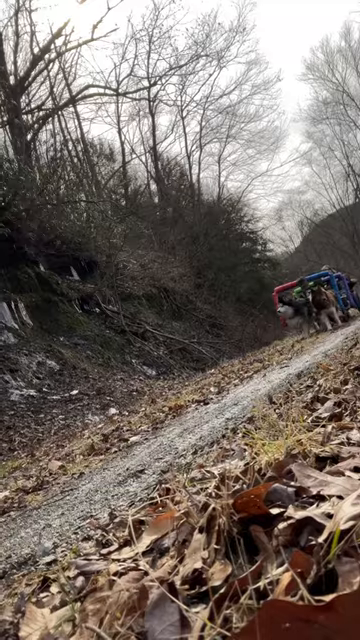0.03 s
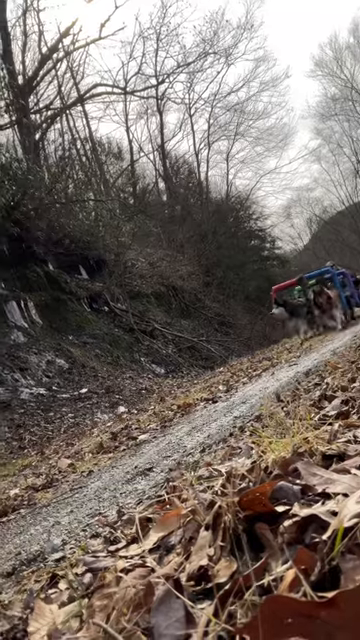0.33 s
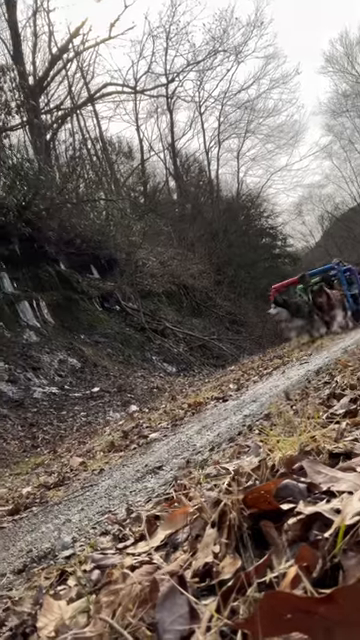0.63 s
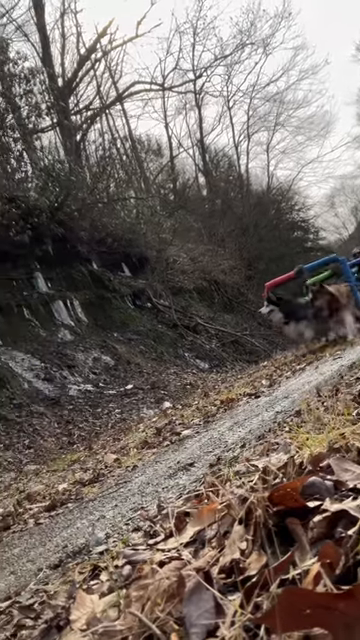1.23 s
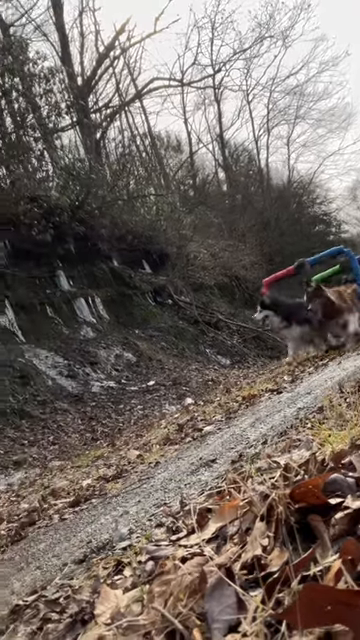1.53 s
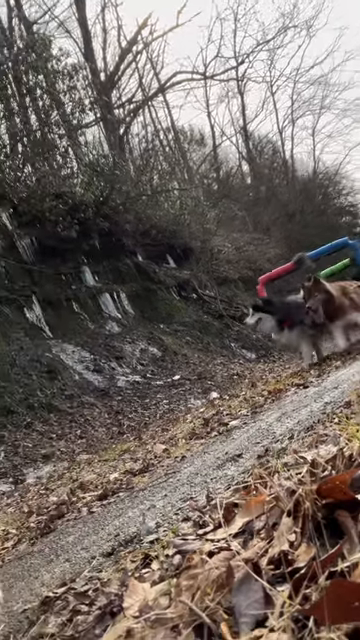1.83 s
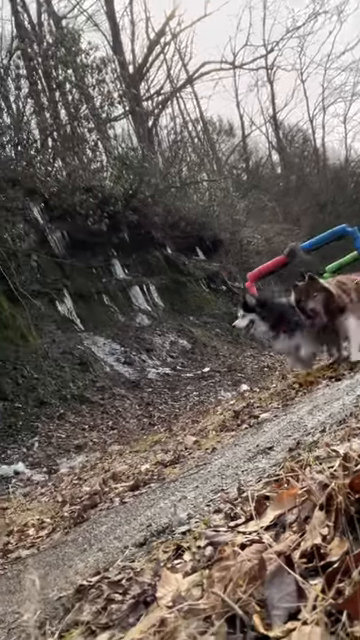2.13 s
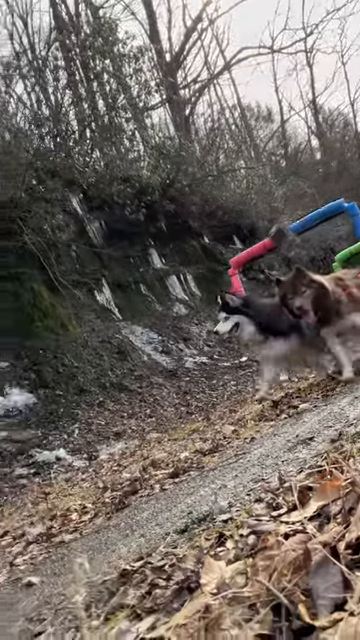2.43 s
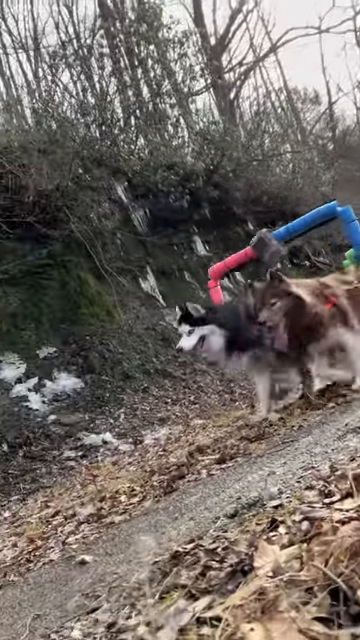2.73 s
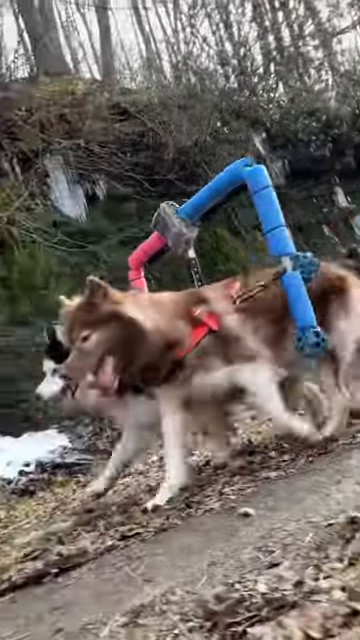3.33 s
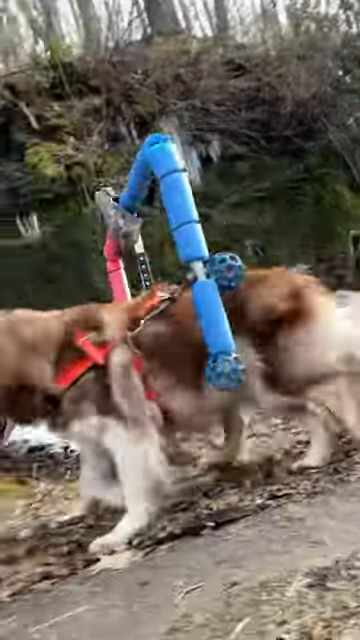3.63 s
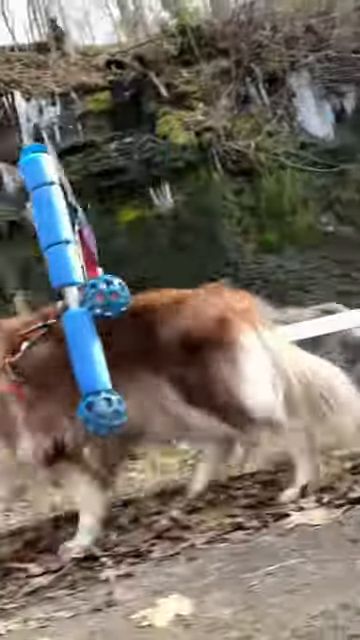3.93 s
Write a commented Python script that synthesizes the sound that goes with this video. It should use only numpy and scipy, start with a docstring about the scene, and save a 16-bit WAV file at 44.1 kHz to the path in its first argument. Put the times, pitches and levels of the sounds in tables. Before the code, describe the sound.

A crackling crunch of wheels on grit approaches outdoors, mixed with the soft steps of trotting dogs. It starts distant, then grows louder and closer, with sharp little snaps, crushed leaves and a few dull ground thumps.

```python
"""Dogs pulling a wheeled rig

Dogs trot closer down a gravel trail strewn with dry leaves. The rig's tyres crackle over the grit,
louder as they near; stones and twigs snap, and clumps of leaves are crushed. Paws pad, scuff and
drag, the ground carries dull thumps, and a few hollow knocks sound. An earth bank and trees add
a short echo, and quiet woodland air lies under it all."""
import sys
import numpy as np
from scipy import signal
from scipy.fft import rfft, irfft, next_fast_len
from scipy.io import wavfile
from scipy.ndimage import uniform_filter1d, map_coordinates

SR = 44100
rng = np.random.default_rng(int(sys.argv[2]) if len(sys.argv) > 2 else 0)


def bounce(signal):
    """Save signal as a 16-bit WAV file at the path given by the first command-line argument."""
    frames = np.transpose(np.atleast_2d(signal))
    limited = np.clip(frames, -1, 1)
    pcm = np.round(limited * 32767).astype(np.int16)
    wavfile.write(sys.argv[1], SR, pcm)


N = 176400  # 4 seconds

# Levels in all tables are relative: the code turns each layer up or down as a whole.
# Tone of crackling grit as the microphone colours it, with a peak near 8.4 kHz and a dip
# near 10 kHz: pitch_hz, level_db
GRIT_AT_MIC = [(880, -39), (1500, -12), (2060, -10), (2710, -1.5), (2990, -3), (3820, -3.5), (5450, -5),
               (8490, 2), (10200, -5.5), (13900, -1), (15200, -2.5), (15800, -4)]
# Tone of a brittle snap as the microphone colours it, with the same treble peak and dip:
# pitch_hz, level_db
SNAP_AT_MIC = [(40, -38), (300, -33.5), (1200, -14), (2500, 3), (3700, 5.5), (5000, 2), (6500, 3),
               (8400, 8.5), (10000, 0), (12000, 3.5), (15500, 0.5)]
# Tone of dry leaves: pitch_hz, level_db
LEAF_TONE = [(40, -42), (200, -25), (700, -2.5), (1300, -1), (1900, 0.5), (2800, 7), (3600, -0.5),
             (5000, -17.5), (12000, -47)]


def amp(db):
    """Turn decibels into a gain to multiply by."""
    return 10 ** (np.asarray(db) / 20)


def unit(x):
    """Scale x to an average power of 1."""
    return x / np.sqrt(np.mean(x ** 2) + 1e-20)


def since(start_s):
    """Seconds since a moment, zero before it."""
    return np.maximum(np.arange(N) / SR - start_s, 0)


def swell(start_s, swell_s):
    """A loudness curve that rises from start_s, reaches 1 after swell_s and dies away."""
    age = np.minimum(since(start_s) / swell_s, 20)
    return (age * np.exp(1 - age)) ** 2


def wobble(per_s):
    """A smooth curve through per_s random values a second."""
    values = rng.standard_normal(int(N * per_s / SR) + 4)
    return map_coordinates(values, [np.arange(N) * per_s / SR])


def coloured(x, tone):
    """Filter x to the shape of a tone table; white noise keeps its overall power."""
    size = 2 * next_fast_len(N // 2 + 8192)
    pitch_hz, level_db = np.transpose(tone)
    log_pitch = np.log(np.fft.rfftfreq(size, 1 / SR) + 1)
    gain = unit(amp(np.interp(log_pitch, np.log(pitch_hz), level_db)))
    # Make the filter ring only after each click, never before it (minimum phase).
    cepstrum = irfft(np.log(gain + 1e-6), size)
    cepstrum[1:size // 2] *= 2
    cepstrum[size // 2 + 1:] = 0
    return irfft(rfft(x, size) * np.exp(rfft(cepstrum)), size)[:N]


def add_tails(x, decay_s):
    """Give every spike in x a fading tail."""
    return signal.lfilter([1], [1, -np.exp(-1 / (SR * decay_s))], x)


def grains(per_s, spread_db, range_db):
    """Random tiny impacts, many small and a few large, each blurred by the leaf litter."""
    hits = rng.random(N) < per_s / SR
    strength = hits * amp(np.minimum(spread_db * rng.exponential(size=N), range_db))
    clicks = unit(strength * np.sign(rng.standard_normal(N)))
    blur = unit(np.sqrt(add_tails(strength ** 2, decay_s=0.0021)) * rng.standard_normal(N))
    return unit(clicks + amp(-4) * blur)


def woodland_air():
    """A quiet, steady hush."""
    # Tone of the air: pitch_hz, level_db
    air_tone = [(25, -38), (38, -50), (52, -27), (70, 4.5), (110, -1), (200, 0.5), (400, -1), (1200, -3),
                (4000, -24), (15000, -6.5)]
    return amp(-53) * coloured(rng.standard_normal(N), air_tone)


def bank_echo(x, fade_s=0.14):
    """The earth bank and trees scatter sound back; the echo falls 60 dB in fade_s."""
    t = np.arange(SR // 4) / SR
    tail = rng.standard_normal(len(t)) * np.exp(-np.log(1000) * t / fade_s)
    return signal.fftconvolve(x, tail / np.linalg.norm(tail))[:N]


def ground_thumps(typical_hz=82):
    """Low bumps that the ground quickly damps, each a deep note mixed with rumble."""
    # Bumps: start_s, level_db
    bumps = [(0.167, -50), (0.961, -53), (1.208, -53), (2.152, -50), (2.273, -53), (2.642, -44),
             (2.683, -45), (2.83, -52), (2.95, -47), (3.276, -48), (3.44, -40.5), (3.621, -46),
             (3.718, -45), (3.953, -39.5)]
    # Tone of the ground's rumble: pitch_hz, level_db
    rumble_tone = [(35, -53), (60, -16), (85, 3), (125, -6), (200, -12), (600, -36)]
    pitches_hz = typical_hz * np.exp(0.11 * rng.standard_normal(len(bumps)))
    rumble = amp(-11) * coloured(rng.standard_normal(N), rumble_tone)
    sound = np.zeros(N)
    for (start_s, level_db), pitch_hz in zip(bumps, pitches_hz):
        note = amp(-5.5) * np.sin(2 * np.pi * pitch_hz * since(start_s))
        sound += amp(level_db) * swell(start_s, swell_s=0.015) * (note + rumble)
    return sound


def hollow_knocks():
    """A few dull, rattly knocks, as if from the rig's frame."""
    # Knocks: start_s, pitch_hz, level_db, swell_s
    knocks = [(.115, 158, -46, 0.011), (0.753, 312, -37.5, 0.0045), (3.891, 231, -41, 0.014)]
    rattle = 0.5 * wobble(per_s=150)
    sound = np.zeros(N)
    for start_s, pitch_hz, level_db, swell_s in knocks:
        note = np.sin(2 * np.pi * pitch_hz * since(start_s) + rattle)
        sound += amp(level_db) * swell(start_s, swell_s) * note
    return sound


def paw_drags(width_hz=1080):
    """Paws drag over coarse gravel: the stones chatter at a pitch that sinks as the stroke slows."""
    # Strokes of a paw: start_s, length_s, from_hz, to_hz, level_db
    strokes = [(0.39, .10, 1685, 1345, -45.5), (2.867, 0.051, 2920, 2710, -39),
               (3.064, 0.096, 2900, 2665, -36), (3.097, 0.084, 4580, 4470, -36.5),
               (3.298, 0.082, 3634, 3440, -33), (3.441, 0.065, 1497, 1358, -40),
               (3.536, 0.1, 3700, 3090, -33.5), (3.765, .09, 3062, 2262, -33.5),
               (3.862, .065, 2200, 1903, -32), (3.925, 0.072, 2620, 2420, -40)]
    chatter = grains(per_s=790, spread_db=3, range_db=9) * np.exp(2j * np.pi * rng.random(N))
    low_pass = signal.butter(2, width_hz / 2, fs=SR)
    slow_chatter = unit(signal.lfilter(*low_pass, [chatter.real, chatter.imag]))
    sound = np.zeros(N)
    for start_s, length_s, from_hz, to_hz, level_db in strokes:
        progress = np.minimum(since(start_s) / length_s, 1)
        phase = 2 * np.pi * np.cumsum(from_hz + (to_hz - from_hz) * progress) / SR
        # Shift the chatter up into a band around the sliding pitch.
        stones = slow_chatter[0] * np.cos(phase) + slow_chatter[1] * np.sin(phase)
        arch = np.sqrt(abs(np.sin(np.pi * progress)))
        sound += amp(level_db - 1.5) * arch * stones
    return sound


def paw_steps():
    """Each paw pads softly on the ground, scuffs the grit and scrapes the leaves."""
    # Paws landing: start_s, pad_db, scuff_db, scrape_db
    steps = [(0.409, -63, -27.5, -34.5), (0.449, -66, -32, -39), (0.561, -41, -48, -35.5),
             (0.689, -47, -30.5, -45), (0.779, -43, -50, -42), (0.869, -65, -43, -45),
             (1.293, -40.5, -33, -43), (1.388, -39, -38, -44), (1.529, -46, -48, -55),
             (1.686, -41, -50, -56), (1.789, -43, -46, -60), (1.918, -36, -49, -60),
             (2.121, -39.5, -28, -33.5), (2.178, -38.5, -50, -53), (2.286, -38, -28, -32),
             (2.379, -37.5, -32, -34.5), (2.614, -47, -26, -29.5), (2.642, -29.5, -34, -36),
             (2.738, -39, -29, -34), (2.87, -37.5, -21.5, -36), (3.091, -31, -27, -37),
             (3.129, -52, -21, -42), (3.312, -29.5, -28, -31.5), (3.555, -42, -22, -36),
             (3.598, -46, -22, -25.5), (3.667, -30.5, -33, -30), (3.779, -39, -29, -26.5),
             (3.816, -34, -38, -30), (3.871, -43, -26, -27), (3.936, -30, -32, -45)]
    # Tone of a soft paw on the ground: pitch_hz, level_db
    pad_tone = [(30, -34), (60, 9), (130, -10), (240, -3), (400, 2.5), (550, 1.5), (800, -2), (1500, -11),
                (5000, -48)]
    pad, scuff, scrape = np.zeros((3, N))
    for start_s, pad_db, scuff_db, scrape_db in steps:
        pad += amp(pad_db - 9.5) * swell(start_s, swell_s=0.013)
        slide = swell(start_s, swell_s=0.016)
        scuff += amp(scuff_db - 10) * slide
        scrape += amp(scrape_db - 8) * slide
    grit = grains(per_s=1100, spread_db=4, range_db=13)
    thuds = pad * coloured(rng.standard_normal(N), pad_tone)
    return thuds + coloured(scuff * grit, GRIT_AT_MIC) + coloured(scrape * grit, LEAF_TONE)


def leaf_crushes():
    """A clump of leaves and grit gives way in a quick run of tiny breaks."""
    # Clumps collapsing: start_s, bright_db, hollow_db, swell_s
    clumps = [(0.566, -28, -24, 0.0027), (0.586, -25, -33, 0.0051), (0.711, -29, -32, .004),
              (2.1874, -12.5, -10, 0.0038), (2.298, -13, -12.5, 0.0036), (2.61, -13, -8.5, 0.0038),
              (2.649, -22, -4, 0.0061), (2.67, -9, -10.5, .0035), (2.854, -11.5, -9, .0043),
              (3.164, -11, -16, 0.0045), (3.306, -13, -24, 0.0069), (3.343, -15, -12, 0.0058),
              (3.482, -16.5, -26, 0.0081), (3.610, -4, -12.5, 0.004), (3.66, -7.5, -10, 0.0084),
              (3.78, -20, -3, 0.0025)]
    bright, hollow = np.zeros((2, N))
    for start_s, bright_db, hollow_db, swell_s in clumps:
        collapse = amp(bright_db - 12.5) * swell(start_s, swell_s)
        bright += collapse
        hollow += amp(hollow_db + 4.5) * collapse  # set relative to the bright part
    breaks = grains(per_s=5000, spread_db=3.5, range_db=15)
    return coloured(bright * breaks, SNAP_AT_MIC) + coloured(hollow * breaks, LEAF_TONE)


def snap_burst(decay_s, ring_hz, ring_db, lead_samples):
    """One break: a burst of noise that rings briefly at its own pitch, then a short scatter."""
    rise_s, scatter_s = 0.0011, 0.012
    ring_width_octaves, ring_cycles = 0.18, 7
    t = np.arange(2048) / SR
    after_peak = np.maximum(t - rise_s, 0)
    fall = np.exp(-after_peak / decay_s) + amp(-22) * np.exp(-after_peak / scatter_s)
    shape = np.minimum(t / rise_s, 1) ** 2 * fall
    spectrum = rfft(np.roll(shape * rng.standard_normal(len(t)), lead_samples))
    spectrum /= np.sqrt(uniform_filter1d(abs(spectrum) ** 2, size=50))  # a break stirs all pitches alike
    ripple_db = 2 * map_coordinates(rng.standard_normal(40), [np.linspace(0, 39, len(spectrum))])
    octaves_away = np.log2((np.fft.rfftfreq(len(t), 1 / SR) + 1) / ring_hz)
    boost_db = ring_db * np.exp(-(octaves_away / ring_width_octaves) ** 2)
    burst = unit(irfft(spectrum * amp(ripple_db + boost_db))) * np.sqrt(np.mean(shape ** 2))
    ring_fade = np.exp(-ring_hz * after_peak / ring_cycles)
    ring = amp(ring_db - 20) * np.sin(2 * np.pi * ring_hz * t) * ring_fade
    return burst + np.roll(ring, lead_samples + round(rise_s * SR))


def stone_and_twig_snaps():
    """Stones pop from under the tyres and twigs break, some with a hollow body."""
    # Single snaps: start_s, bright_db, hollow_db, decay_s, ring_hz, ring_db
    snaps = [(0.313, -16, -17, 0.0026, 2200, 10), (0.338, -21, -18.5, 0.0011, 2730, 1),
             (0.3756, -22, -21.5, 0.0014, 1950, 0), (0.4822, -15.5, -18, 0.0015, 12000, 13),
             (0.483, -22, -20, 0.0017, 1760, 7), (0.521, -24, -20.5, 0.0011, 2160, 10),
             (0.5394, -10, -18, .0013, 2000, 19), (0.5942, -19.5, -26, .001, 11660, 18),
             (0.7497, -15.5, -31, 0.0012, 5600, 15), (0.8617, -21, -23, 0.0011, 7800, 4),
             (1.051, -18, -21, 0.0012, 8400, 2), (1.1889, -13.5, -26, 0.00087, 8600, 5),
             (1.2882, -18.5, -21, 0.00061, 7240, 6), (1.3835, -22.5, -33, .0023, 8800, 5),
             (1.724, -21, -33, 0.00073, 8030, 5), (1.7989, -18.5, -20, .0008, 8600, 9),
             (1.822, -25, -27, .001, 3540, 4), (1.893, -18.5, -20, 0.00053, 7980, 6),
             (1.915, -17.5, -19, 0.0023, 9000, 9), (1.9782, -18.5, -17, .0009, 2050, 9),
             (1.986, -17.5, -29, .001, 4100, 6.5), (2.054, -22, -23, .001, 8200, 1),
             (2.066, -18.5, -26, .0014, 8000, 3), (2.1189, -19.5, -19, 0.0023, 8900, 7),
             (2.136, -19, -21.5, 0.0012, 2800, 7), (2.204, -26, -20, .0012, 11800, 9),
             (2.2421, -21, -25, .001, 14000, 7), (2.268, -17, -18.5, 0.00092, 7830, 2),
             (2.5051, -10.5, -46, 0.0013, 6430, 2), (2.5608, -15.5, -20.5, .0011, 8210, -1),
             (2.661, -11, -10, .0009, 2600, 6), (2.7379, -12.5, -25, .0012, 8200, -6),
             (2.7983, -20, -22, 0.001, 7730, 6), (2.845, -15, -20, 0.0012, 7800, 7),
             (2.9357, -17, -16.5, .0013, 8860, 3), (2.969, -17.5, -23, 0.0014, 6940, 9),
             (3.018, -16, -23, .001, 8040, 5), (3.047, -14, -28, 0.0013, 12000, 5),
             (3.0725, -10.5, -19, 0.0038, 11500, 4), (3.1076, -22, -17, .0016, 2350, 4),
             (3.1492, -8, -20, 0.0022, 5660, 7), (3.248, -12, -14, 0.00099, 8300, 3),
             (3.278, -11, -27, 0.0013, 7520, 2), (3.3175, -5.5, -17, 0.0012, 3600, 4),
             (3.321, -7.5, -29, 0.00092, 7800, 0), (3.3876, -12, -15, 0.0038, 4000, 4),
             (3.469, -15, -14, .0012, 8600, 14), (3.572, -10, -24, .001, 7800, 4),
             (3.6169, -10, -5, 0.0012, 1380, 7), (3.6875, 0, -24, 0.0013, 6650, 6.5),
             (3.689, -8, -24, 0.0011, 3700, 14), (3.741, -12, -15, .0012, 2470, 15)]
    # Tone of the hollow body: pitch_hz, level_db
    hollow_tone = [(40, -42), (200, -20), (700, -19), (1300, -3), (2000, -1), (2600, -3.5), (3400, 3),
                   (5000, -25), (12000, -51)]
    lead_samples = 64  # room before each burst
    bright, hollow = np.zeros((2, N + SR))
    for start_s, bright_db, hollow_db, decay_s, ring_hz, ring_db in snaps:
        burst = snap_burst(decay_s, ring_hz, ring_db, lead_samples)
        first = round(start_s * SR) - lead_samples
        bright[first:first + len(burst)] += amp(bright_db - 9) * burst
        hollow[first:first + len(burst)] += amp(hollow_db - 11.5) * burst
    return coloured(bright[:N], SNAP_AT_MIC) + coloured(hollow[:N], hollow_tone)


def tyres():
    """Grit crackles and grinds under the wheels in clumps; now and then a grain ticks louder."""
    # Loudness of the rolling rig: time_s, crackle_db, grind_db
    approach = [(0.05, -48.5, -54.5), (0.14, -47, -53), (0.28, -49.5, -54), (0.42, -43, -53),
                (0.56, -46, -49.5), (0.68, -47, -49), (1.0, -45, -51.5), (1.55, -47.5, -52.5),
                (1.65, -43.5, -51), (2.16, -44, -49), (2.225, -44.5, -51.5), (2.32, -38.5, -47),
                (2.58, -38, -44), (2.68, -36, -43.5), (2.81, -39, -43), (2.89, -37, -41), (3.0, -34.5, -43),
                (3.13, -32, -38), (3.19, -32.5, -41), (3.35, -30.5, -37), (3.425, -32.5, -41.5),
                (3.485, -29, -39.5), (3.58, -29, -35.5), (3.68, -30.5, -39), (3.715, -35.5, -39.5),
                (3.8, -28.5, -37), (3.91, -31, -38.5), (3.95, -40.5, -38.5), (4.0, -37.5, -43.5)]
    # Tone of the lower grinding: pitch_hz, level_db
    grind_tone = [(30, -64), (60, -27), (130, -7), (250, -5), (430, -1), (600, -4), (780, -2), (1000, -1.5),
                  (1350, 2), (2000, 0), (2900, -7.5), (4000, -9), (6000, -7.5), (12000, -54)]
    time_s, crackle_points, grind_points = np.transpose(approach)
    crackle_db = np.interp(since(0), time_s, crackle_points)
    grind_db = np.interp(since(0), time_s, grind_points) + 0.5
    clump_db = 0.5 * wobble(per_s=50) + 1.9 * wobble(per_s=260)
    crackle = coloured(grains(per_s=3500, spread_db=3.5, range_db=12), GRIT_AT_MIC)
    grind = coloured(grains(per_s=2200, spread_db=3.5, range_db=13), grind_tone)
    rolling = amp(clump_db) * (amp(crackle_db) * crackle + amp(grind_db) * grind)
    tick_shapes = add_tails(abs(grains(per_s=84, spread_db=4, range_db=8)), decay_s=0.0006)
    ticks = coloured(unit(tick_shapes * rng.standard_normal(N)), GRIT_AT_MIC)
    # The ticks grow more slowly than the crackle as the rig nears.
    tick_db = crackle_db.mean() - 7.5 + 0.4 * (crackle_db - crackle_db.mean())
    return rolling + amp(tick_db) * ticks


def scene():
    """The dogs and their rig, with a short echo, over quiet woodland air; one channel."""
    team = tyres() + stone_and_twig_snaps() + leaf_crushes()
    team += paw_steps() + paw_drags() + ground_thumps() + hollow_knocks()
    return (woodland_air() + team + amp(-12.5) * bank_echo(team))[None]


def record(dry):
    """Thin the deepest bass, fade in after a brief silence and cut off the highest treble."""
    low_cut_hz, top_hz = 52, 15900
    silence_s, fade_in_s = 0.034, 0.004
    thinned = signal.sosfilt(signal.butter(4, low_cut_hz, 'high', fs=SR, output='sos'), dry)
    fade_in = np.minimum(since(silence_s) / fade_in_s, 1)
    size = next_fast_len(N + SR // 2)
    below_top = np.fft.rfftfreq(size, 1 / SR) < top_hz
    return irfft(rfft(thinned * fade_in, size) * below_top, size)[..., :N]


dry = scene()
out = record(dry)
bounce(out)
```